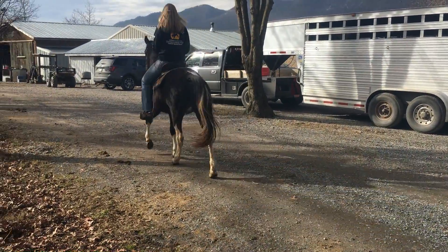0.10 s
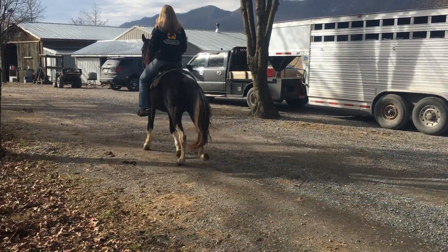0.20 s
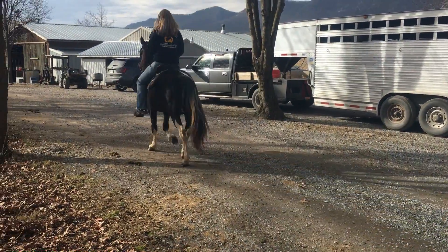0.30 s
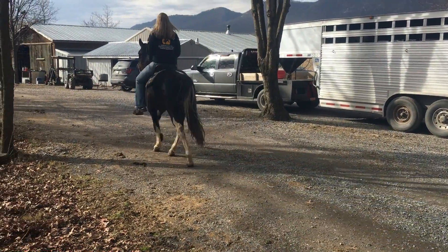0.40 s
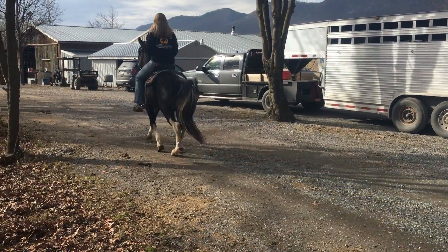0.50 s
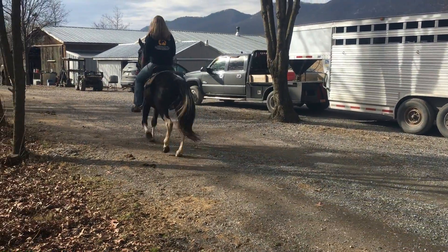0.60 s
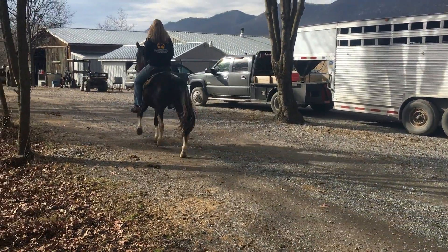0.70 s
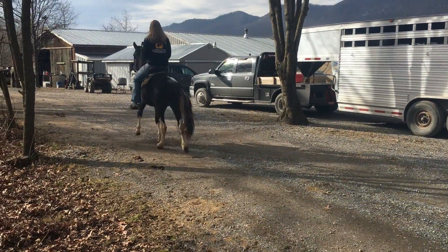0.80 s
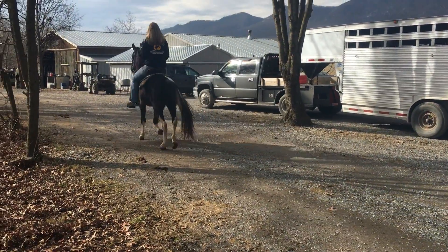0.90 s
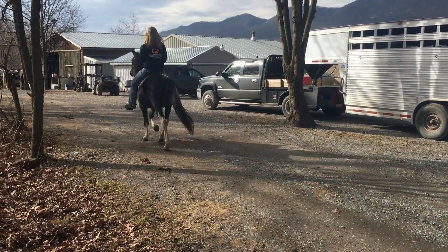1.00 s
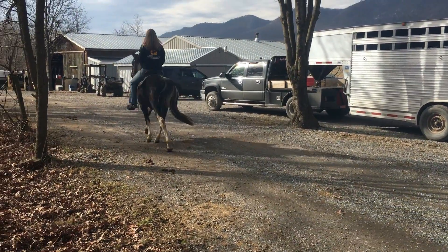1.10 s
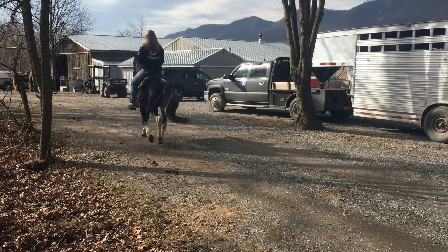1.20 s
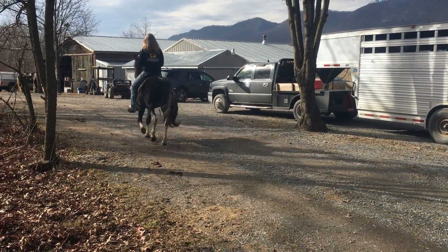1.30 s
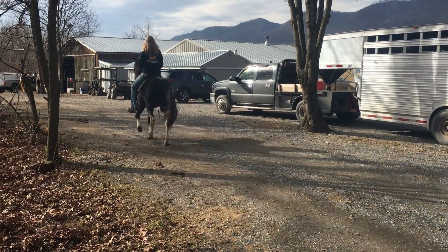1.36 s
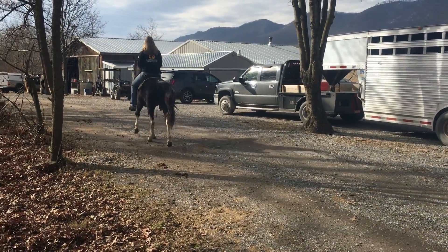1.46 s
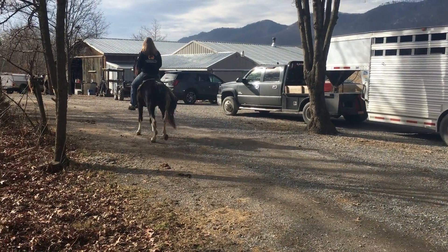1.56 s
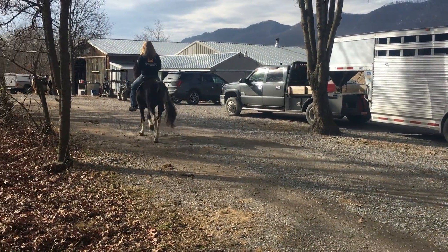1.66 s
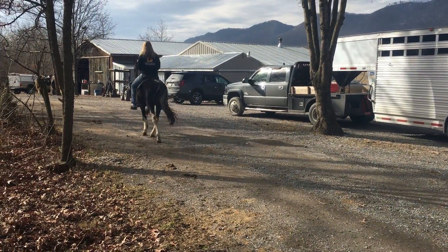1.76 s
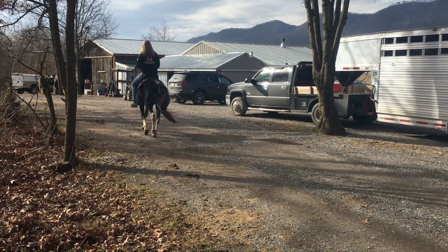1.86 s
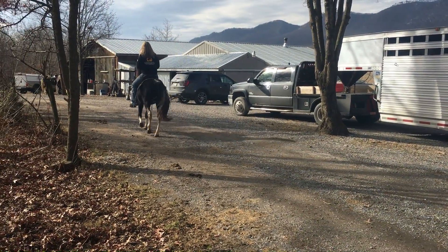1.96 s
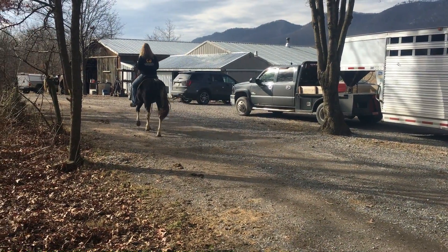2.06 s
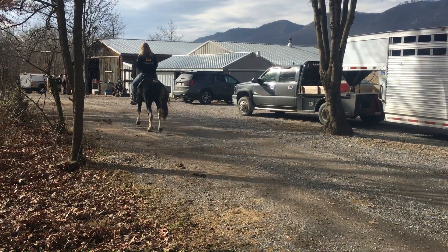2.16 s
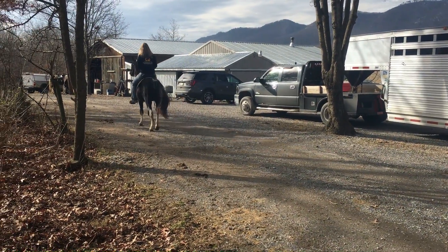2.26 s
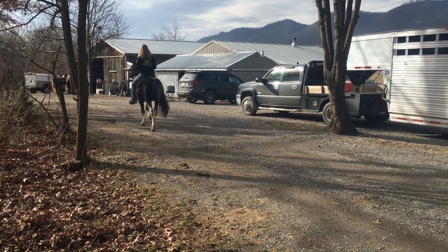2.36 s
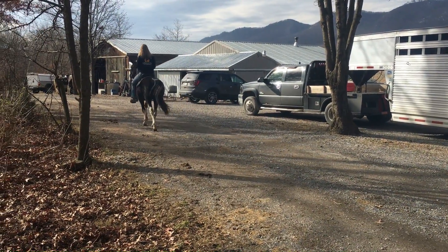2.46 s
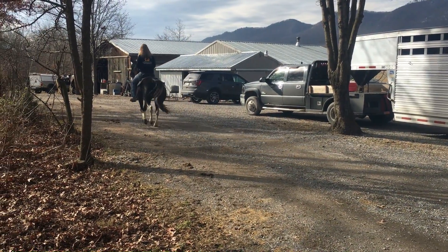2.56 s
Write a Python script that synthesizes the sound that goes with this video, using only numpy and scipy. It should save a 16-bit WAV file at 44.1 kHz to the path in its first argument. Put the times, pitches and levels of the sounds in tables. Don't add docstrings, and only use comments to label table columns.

```python
import sys
import numpy as np
from scipy import signal
from scipy.fft import rfft, irfft
from scipy.io import wavfile
from scipy.ndimage import uniform_filter1d

SR = 44100
rng = np.random.default_rng(int(sys.argv[2]) if len(sys.argv) > 2 else 0)


def transcribe(u):
    v = np.clip(np.atleast_2d(u).T, -1, 1)
    q = np.round(v * 32767).astype(np.int16)
    wavfile.write(sys.argv[1], SR, q)


def elevation(decibels):
    levels = np.asarray(decibels, float)
    return 10 ** (levels / 20)


N = 116865


def evened(x):
    return x / np.sqrt(np.mean(x ** 2) + 1e-20)


def read(points, hz):
    f, value = np.transpose(points)
    return np.interp(np.log(hz + 1), np.log(f + 1), value)


def add(mix, s, sound):
    part = mix[max(round(s * SR), 0):][:len(sound)]
    part += sound[:len(part)]


def coloured(x, points):
    cep = irfft(np.log(elevation(read(points, np.fft.rfftfreq(4096, 1 / SR)))))
    cep[1:2048] *= 2
    cep[2049:] = 0
    response = irfft(np.exp(rfft(cep)))[:2048]
    return signal.oaconvolve(x, response)[:len(x)]


def ring(hz, t60, rise, phase):
    t = np.arange(1200) / SR
    shape = (1 - np.exp(-(t / rise) ** 2)) * elevation(-60 * t / t60)
    return shape / shape.max() * np.sin(2 * np.pi * (hz * t + phase))


# (frequency [Hz], gain [dB])
GROUND_PATH = [(450, -19.5), (750, -2.5), (1300, 1), (2150, -8), (3100, -2.5), (3500, -8), (4000, -19),
               (6600, -22.5)]


def over_ground(x):
    return coloured(x, GROUND_PATH)


def air(points, patchy_db):
    hz = np.fft.rfftfreq(1024, 1 / SR)
    a, b, patches = rng.standard_normal((N // 256 + 5, 513, 3)).T
    patches = uniform_filter1d(patches, size=8, axis=0)
    patches = evened(uniform_filter1d(patches, size=10, axis=1))
    z = (a + 1j * b) * elevation(read(points, hz)[:, None] + patchy_db * patches)
    return evened(signal.istft(z, nperseg=1024, noverlap=768)[1][:N])


# (frequency [Hz], level [dB])
RUMBLE_SPECTRUM = [(30, -46), (45, -1.5), (72, 1), (136, 0), (200, -9), (260, -9.5), (420, -24.5),
                   (900, -62)]
# (frequency [Hz], level [dB])
WASH_SPECTRUM = [(300, 8), (1100, -9.5), (3000, -9.5), (6000, -12), (9000, -18)]
# (frequency [Hz], level [dB])
HISS_SPECTRUM = [(3000, 30), (7000, 6), (12000, -10), (16000, -10)]


def background():
    rumble = air(RUMBLE_SPECTRUM, patchy_db=2.33)
    wash = evened(over_ground(air(WASH_SPECTRUM, patchy_db=2.5)))
    hiss = air(HISS_SPECTRUM, patchy_db=3.0)
    return elevation(-52.5) * rumble + elevation(-59.5) * wash + elevation(-84) * hiss


LOAD_STARTS = [.001, .058, .235, .335, .381, .406, .568, .655, .691, .775, .838, .913, .941, 1.036, 1.061,
               1.228, 1.298, 1.351, 1.404, 1.425, 1.614, 1.668, 1.732, 1.929, 1.946, 2.068, 2.275, 2.355,
               2.404, 2.612]
# (length [s], level [dB], brightness [dB per octave])
LOADS = [(0.017, -40.5, 2), (0.013, -35, 1), (0.044, -34.5, 0), (0.048, -51.5, 2), (0.0086, -37, 0.5),
         (0.0077, -46.5, 1), (0.038, -34, 0.5), (0.016, -37.5, -0.5), (0.031, -38.5, -1),
         (0.0062, -39, -1.5), (0.0086, -45.5, 0.5), (0.019, -39, 0), (0.068, -43.5, 2.5), (0.01, -45, 0.5),
         (0.045, -41.5, -2), (0.067, -38, 0), (0.066, -51.5, 5), (0.06, -44, 1.5), (0.0082, -27.5, 0.5),
         (0.016, -57.5, 10), (0.038, -35, 1), (0.097, -49, 3), (0.058, -44.5, 0), (0.011, -38.5, 3.5),
         (0.025, -35, 0.5), (0.024, -40, 1), (0.028, -40.5, 2), (0.037, -48.5, 2.5), (0.022, -44, 1.5),
         (0.037, -45.5, 0.5)]
# (frequency [Hz], gain [dB])
STONE_COLOUR = [(400, 15), (1200, 2.5), (6500, 0.5), (8000, -11), (10500, -19.5), (13000, -24),
                (16000, -27)]
RISE_SHARE, SAG_DB = 0.099, -4.5
RELEASE_S, SETTLE_DB, SETTLE_S, TRICKLE_DB = 0.003, -19, 0.14, 7
GRAINS_PER_S, SPREAD_DB, CYCLES, CLUMP_DB = 14000, 3.5, 1.53, 2


def load_envelopes(t, length):
    u = t - np.array(LOAD_STARTS)[:, None]
    late = np.maximum(u - length, 0)
    press = np.clip(u / (RISE_SHARE * length), 0, 1) * elevation(SAG_DB * np.clip(u / length, 0, 1))
    wander = evened(uniform_filter1d(rng.standard_normal(u.shape[1]), size=10))
    trickle = elevation(TRICKLE_DB * np.minimum(wander, 2))
    return press * (np.exp(-late / RELEASE_S) + elevation(SETTLE_DB) * trickle * np.exp(-late / SETTLE_S))


def crunch(sizes=22):
    t, out = np.arange(N) / SR, np.zeros(N)
    coarse = t[::16]
    length, db, bright = np.transpose(LOADS)[:, :, None]
    load = load_envelopes(coarse, length)
    clump = elevation(CLUMP_DB * evened(uniform_filter1d(rng.standard_normal(N), size=170)) - 1.5)
    for hz in np.geomspace(450, 15000, sizes):
        rate = GRAINS_PER_S * (hz / 1500) ** .25 / sizes / SR
        strength = elevation(SPREAD_DB * np.minimum(rng.exponential(1, N), 3))
        slips = (rng.random(N) < rate) * strength * rng.choice([-1., 1.], N)
        gain = elevation(db + bright * np.log2(min(hz, 6000) / 1500))
        level = np.interp(t, coarse, np.sqrt(((load * gain) ** 2).sum(0)))
        grain = ring(hz, 1.66 * CYCLES / hz, 0.43 / hz, 0)
        grain *= np.sqrt(hz / 3000 / rate) / np.linalg.norm(grain) * elevation(-14.0)
        out += signal.oaconvolve(slips * level * clump, grain)[:N]
    return over_ground(coloured(out, STONE_COLOUR))


# (frequency [Hz], gain [dB])
TICK_COLOUR = [(1000, 4), (2300, -3), (4000, 1), (6500, -0.5), (7800, -13.5), (10000, -23), (16000, -30)]


def tick(noise):
    t = np.arange(len(noise)) / SR
    burst = noise * np.exp(-t / 0.0014) * np.minimum(t * 1500, 1)
    return coloured(burst, TICK_COLOUR) * 2.7


# (time [s], level [dB], knock [Hz],
# clink [dB re knock], tick [dB re knock])
EARLY_KNOCKS = [(0.0057, -50.5, 620, 19.5, -17), (0.0528, -34, 1470, -3, -44), (0.2502, -29, 858, 0, -8.5),
                (0.383, -26, 763, -6.5, -45), (0.5776, -24, 1005, -37, -24), (0.5916, -26, 1750, -27, -15.5),
                (0.5990, -26, 1160, -3.5, -22), (0.667, -28.5, 1520, -2, -26), (0.7129, -30, 1440, -3, -25),
                (0.7389, -35, 1070, -10, -43), (0.7553, -32.5, 1015, 4, -10), (0.8187, -31, 983, -1, -15)]
MIDDLE_KNOCKS = [(0.9203, -23, 1430, -9.5, -14.5), (0.9276, -30, 1460, -3, -13.5),
                 (0.9445, -32, 1400, -2.5, -24), (0.9590, -32, 1600, -30, -42),
                 (0.9815, -38, 1130.0, 6.5, -32), (1.0674, -24, 1290, -7.5, -30), (1.228, -32, 1240, -13, -33),
                 (1.2472, -27.5, 1114, -8.5, -17), (1.2528, -27, 1425, -7, -29.0),
                 (1.2775, -32.5, 1460, -16, -12), (1.354, -30.5, 1340, 0, -11.5),
                 (1.3763, -46, 1507.0, 9, -32), (1.386, -30.5, 1120, -5, -18.5), (1.4075, -22, 1604, 2, -12),
                 (1.6166, -21.5, 1580, -17, -22), (1.6238, -21.5, 1393, -3, -18),
                 (1.6321, -33, 1310, -15, -7.5), (1.6915, -34, 1291.0, -9, -19)]
LATE_KNOCKS = [(1.7251, -26, 1480, -1.5, -26), (1.729, -13.5, 1250, -12.5, -36),
               (1.7432, -22.5, 1380, -4, -20.5), (1.7655, -41.5, 1290, 7.5, -30),
               (1.9363, -30.5, 1630, -12, -20.5), (1.9483, -27, 1580, -16, -20), (1.954, -27, 1340, -1, -16),
               (2.02, -32.5, 1350, -5, -21), (2.074, -30, 1286, -0.5, -41), (2.2775, -26.5, 1220, 2, -20.5),
               (2.2828, -33, 1490, 4.5, -30), (2.298, -39.5, 1160, 4.5, -27), (2.344, -40, 1080, 3.5, -31),
               (2.3636, -36, 1086, 9.5, -17.5), (2.4136, -37.5, 1370, 2, -25), (2.6183, -36, 1050, 2, -47)]
# share of CLINK_HZ, also used as level [ratio]
CLINK_MODES = (0.756, 0.93, 0.98)
RISE_CYCLES, RING_CYCLES = 1.283, 12.2
CLINK_HZ, CLINK_T60 = 2960, 0.016


def knocks():
    out = np.zeros(N)
    for s, db, hz, clink_db, tick_db in EARLY_KNOCKS + MIDDLE_KNOCKS + LATE_KNOCKS:
        r = rng.random(8)
        rise, t60 = RISE_CYCLES / hz, RING_CYCLES / hz
        partner_hz = hz * (0.739 + 0.18 * r[1])
        knock = ring(hz, t60, rise, r[0]) + 0.37 * ring(partner_hz, t60, rise, r[2])
        add(out, s - 1.527 * rise, elevation(db + 3.5) * knock)
        clink = np.zeros(1200)
        for j, k in enumerate(CLINK_MODES):
            clink += k * ring(CLINK_HZ * (k + .1 * r[3 + j]), CLINK_T60, 0.00064, r[5 + j])
        add(out, s - .0016, elevation(db + clink_db - 4.5) * clink)
        add(out, s - .0019, elevation(db + tick_db + 4.0) * tick(rng.standard_normal(600)))
    return out


# (frequency [Hz], t60 [s])
YARD_T60 = [(500, 0.27), (1300, 0.38), (8000, 0.26)]


def yard_echo(x):
    taps = np.zeros(SR // 2)
    at = np.arange(300, len(taps) - 22, 22)
    taps[at + rng.integers(0, 22, len(at))] = rng.choice([-1., 1.], len(at))
    hz, t, z = signal.stft(taps, SR, nperseg=256)
    decay = elevation(-60 * t / read(YARD_T60, hz)[:, None])
    tail = signal.istft(z * decay, SR, nperseg=256)[1]
    return elevation(-16) * signal.fftconvolve(x, tail / np.linalg.norm(tail))[:N]


# (time [s], level [dB], ring [Hz])
DULL_STONES = [(0.0127, -65, 1080), (0.066, -36, 1270), (0.2388, -42, 1200), (0.2577, -34, 940),
               (0.2616, -39, 1120), (0.2739, -33, 1380), (0.4071, -47, 1030), (0.5866, -31.0, 1350),
               (0.693, -44, 1480), (0.6983, -43, 1170.0), (0.9683, -45, 1290), (0.975, -41, 1300),
               (0.9869, -43, 1200.0), (0.9917, -42.0, 1240), (1.041, -42, 1590), (1.094, -36.5, 1180),
               (1.1008, -41, 1120), (1.2363, -40.0, 1000.0), (1.281, -30.5, 1550.0), (1.2856, -45, 1390),
               (1.334, -46, 1170.0), (1.366, -43, 1200.0), (1.396, -40.0, 1380), (1.4307, -45, 1330),
               (1.645, -38, 1330), (1.6723, -36, 1350.0), (1.6839, -41, 1260), (1.6995, -40.0, 1330.0),
               (1.7173, -46, 1430.0), (1.7486, -33.0, 1235), (1.7532, -38, 1220.0), (1.7604, -36.5, 1130),
               (1.7712, -35, 1560), (1.793, -42, 1080.0), (1.9606, -34, 1250.0), (1.9735, -51, 1370),
               (2.08, -30, 1173), (2.2935, -34, 1340), (2.3175, -42, 1150), (2.6262, -38, 1020)]
# (time [s], level [dB], ring [Hz])
BRIGHT_STONES = [(0.0644, -35.5, 2600), (0.242, -38, 2960.0), (0.261, -29.5, 2975), (0.2721, -40, 3130),
                 (0.582, -33, 2700), (0.612, -43, 3160), (0.6216, -41, 3020), (0.658, -42.0, 2800.0),
                 (0.7789, -40, 3180), (0.953, -39, 3100), (0.9883, -33, 3040), (1.2603, -36, 2830),
                 (1.272, -39, 2860), (1.2816, -41, 3020), (1.3048, -38.5, 3270), (1.3213, -42.0, 3070),
                 (1.331, -36.5, 3060), (1.3588, -37, 3180), (1.399, -39, 2840), (1.4161, -46, 2730),
                 (1.4716, -42.5, 2840.0), (1.646, -41, 3300), (1.6704, -43, 2910), (1.6837, -43, 2990),
                 (1.698, -45, 2800), (1.7366, -36, 2940.0), (1.772, -38, 3090), (1.9322, -36.5, 3070.0),
                 (1.939, -40, 2830), (1.9724, -38, 3090), (1.9772, -38, 3130.0), (2.0802, -35, 3020),
                 (2.377, -46.0, 2940), (2.4322, -43, 3330), (2.6228, -40, 2790), (2.6401, -41.5, 2960.0)]


def shifts():
    out = np.zeros(N)
    for s, db, hz in DULL_STONES + BRIGHT_STONES:
        rise = 0.001493 * (1300 / hz) ** .2
        add(out, s - rise, elevation(db + 0.5) * ring(hz, 7.2 * rise, rise, rng.random()))
    return out


# (time [s], level [dB], length [s], pitch [Hz])
SOIL_THUDS = [
    (.262, -47, .06, 185),
    (1.283, -46, .05, 205),
    (1.962, -43, .065, 195),
    (2.625, -51, .05, 125),
    (1.77, -58, .5, 136),
]


def thuds():
    out = np.zeros(N)
    for s, db, length, hz in SOIL_THUDS:
        t = np.arange(0, length, 1 / SR)
        push = np.sin(np.pi * t / length) * np.sin(2 * np.pi * (hz * t + rng.random()))
        add(out, s - length / 2, elevation(db + 3) * push)
    return out


# (time [s], level [dB])
SKIPPING_PEBBLES = [(.622, -56), (1.112, -51.5), (1.221, -48.5), (1.32, -48), (1.478, -49.5), (1.772, -50),
                    (1.793, -51), (0.273, -38.5), (0.387, -51), (.944, -36), (1.522, -55), (1.563, -55)]


def pebbles():
    out = np.zeros(N)
    for s, db in SKIPPING_PEBBLES:
        add(out, s - .0009, elevation(db - 1) * tick(rng.standard_normal(600)))
    return out


def scene():
    hooves = crunch() + knocks() + shifts() + pebbles()
    return (background() + hooves + yard_echo(hooves) + thuds())[None]


def top_cut(x):
    return signal.sosfilt(signal.butter(12, 16430, fs=SR, output="sos"), x)


def record(dry):
    edge = signal.firwin(401, 16050, fs=SR)[None]
    mix = signal.oaconvolve(dry, edge, "same")
    return top_cut(mix)


dry = scene()
out = record(dry)
transcribe(out)
```